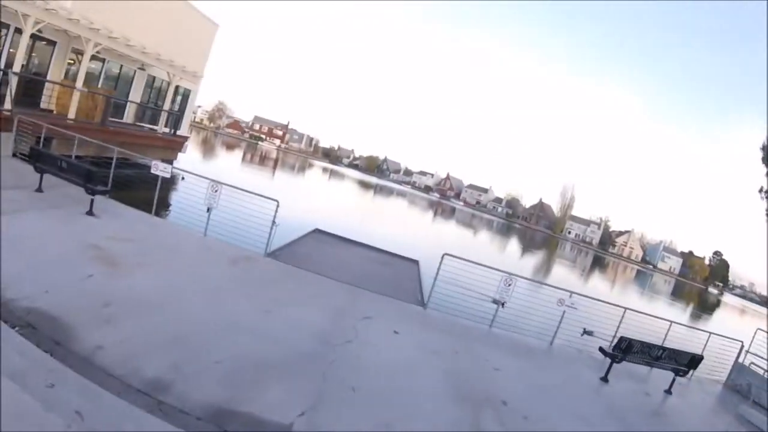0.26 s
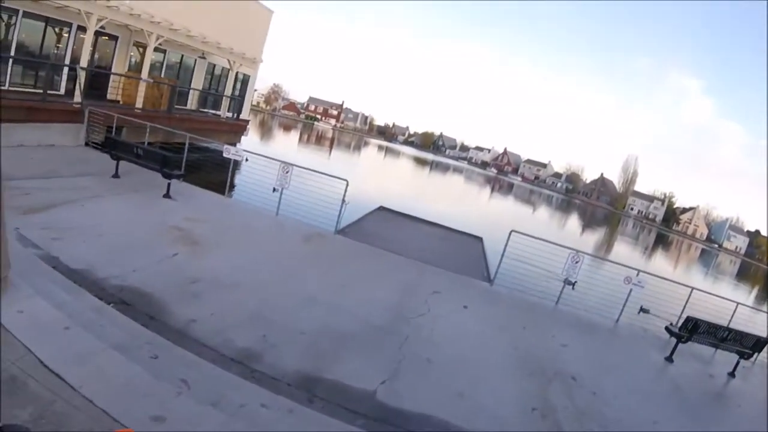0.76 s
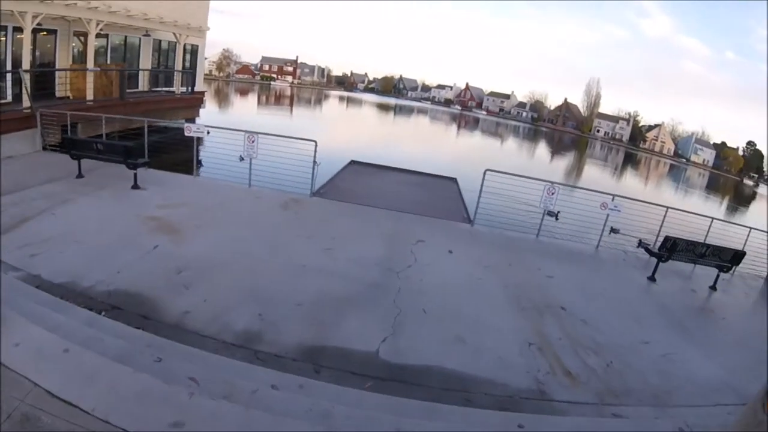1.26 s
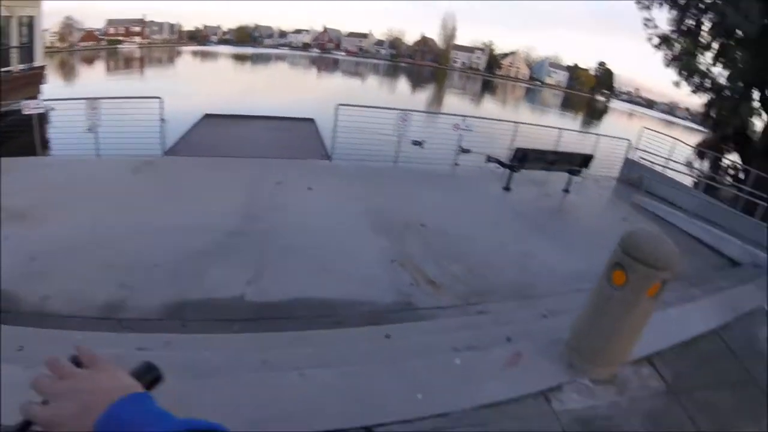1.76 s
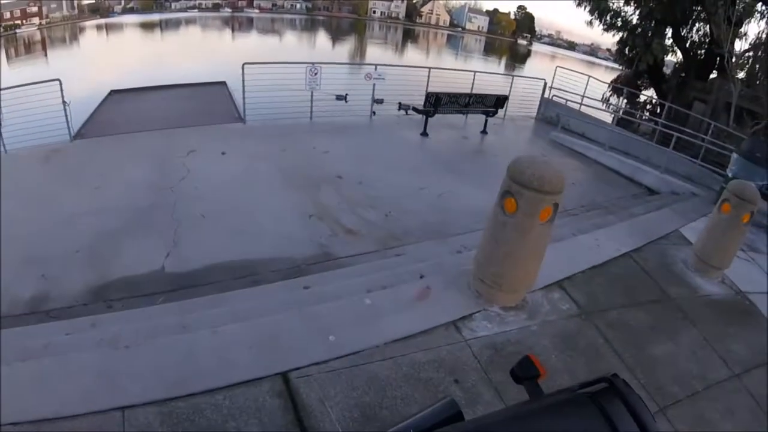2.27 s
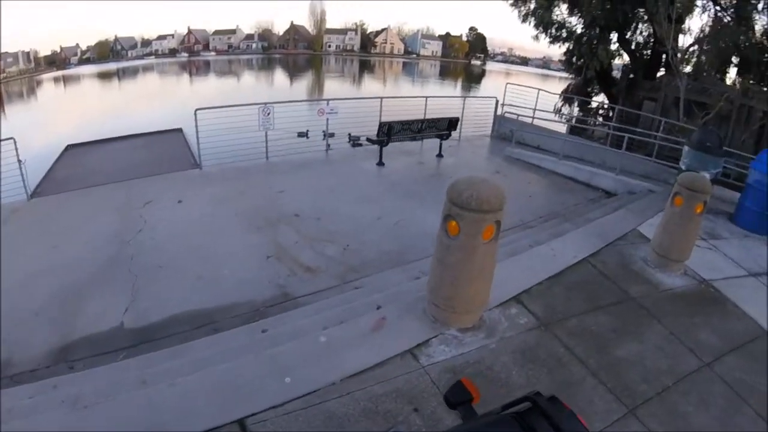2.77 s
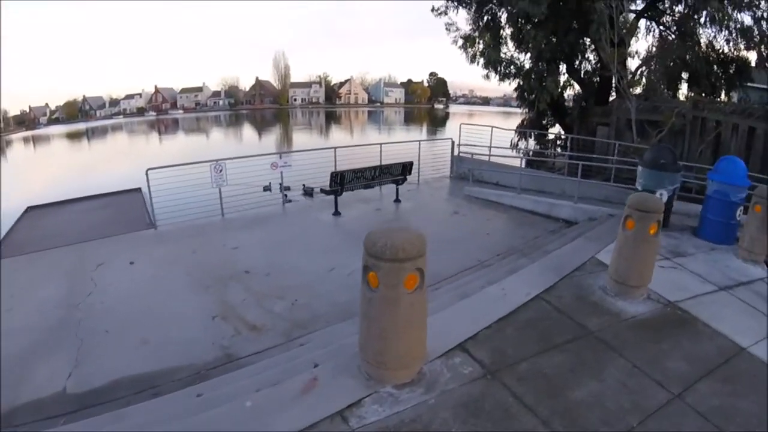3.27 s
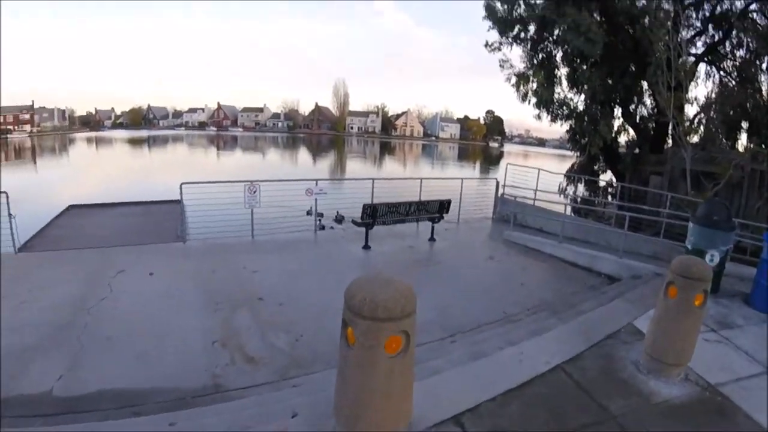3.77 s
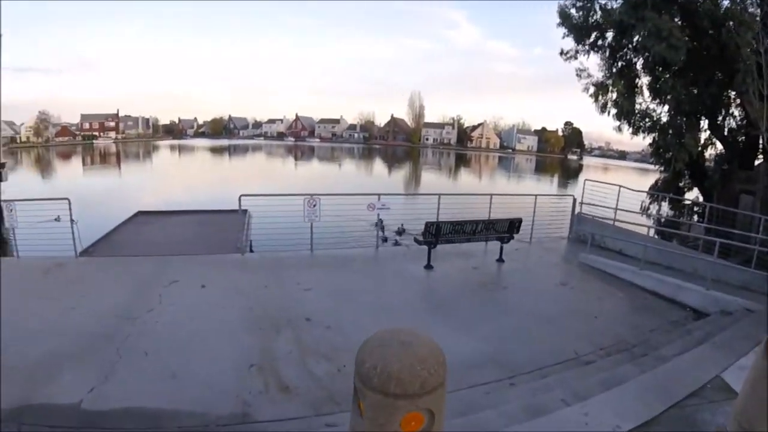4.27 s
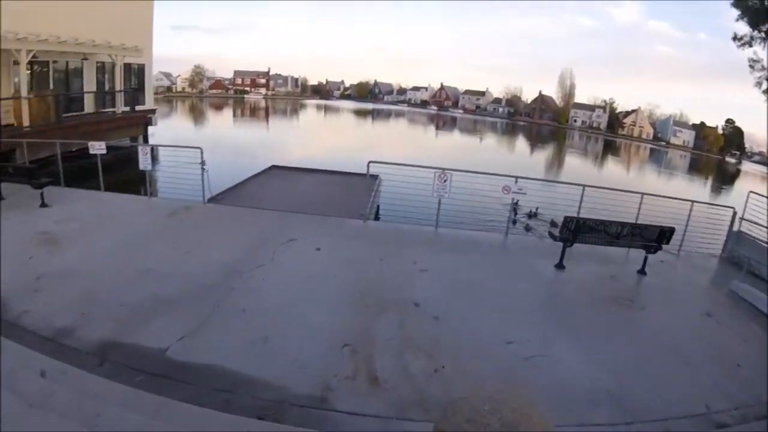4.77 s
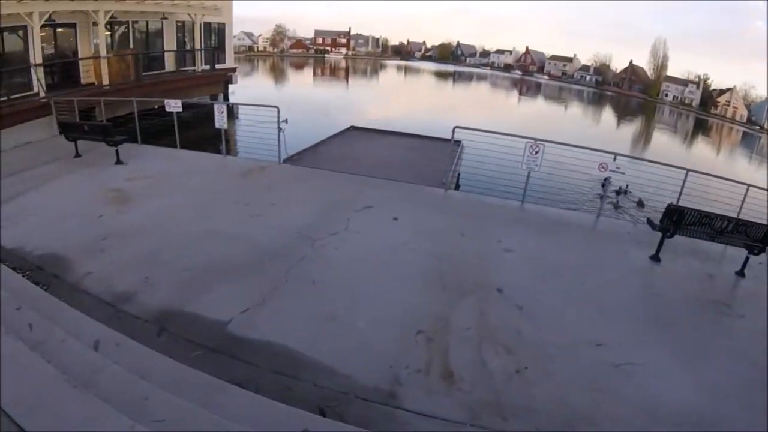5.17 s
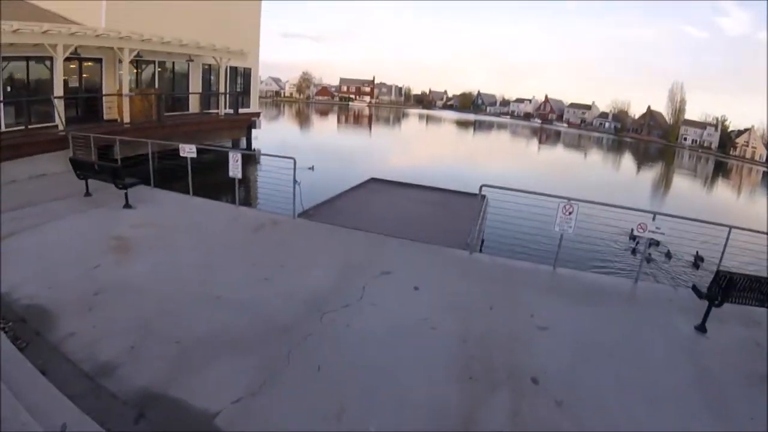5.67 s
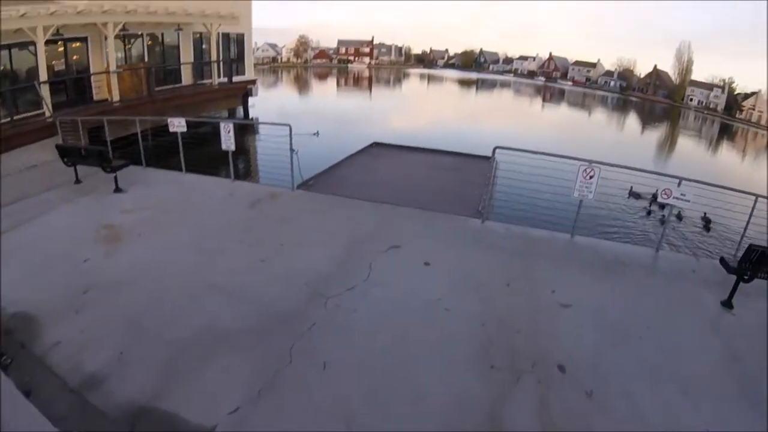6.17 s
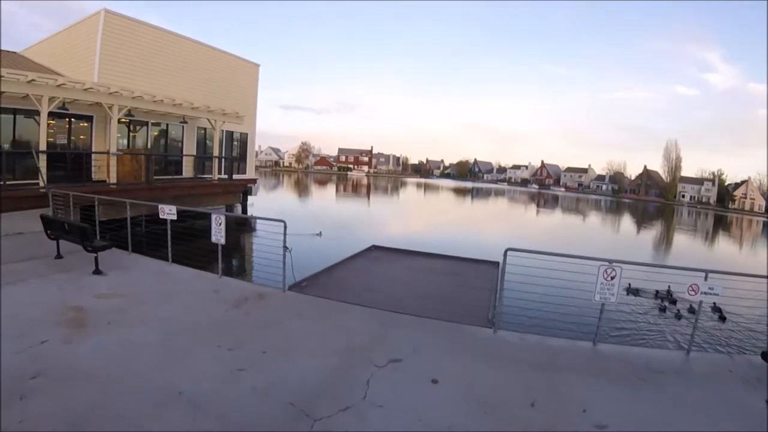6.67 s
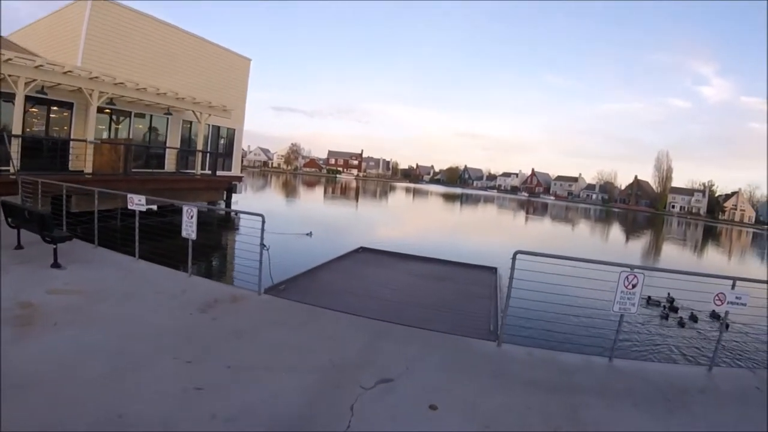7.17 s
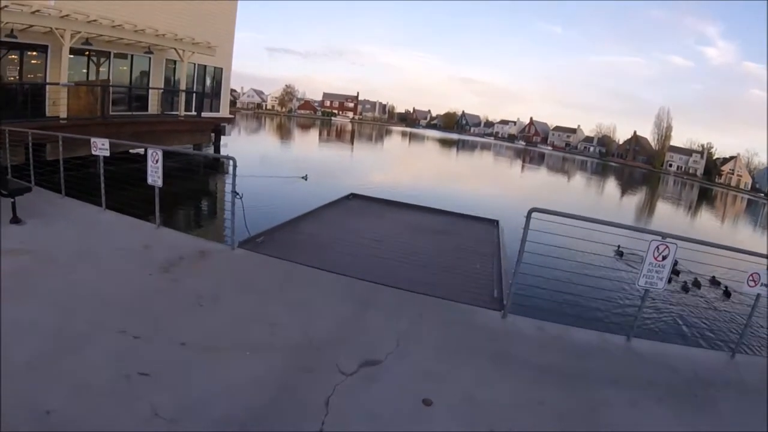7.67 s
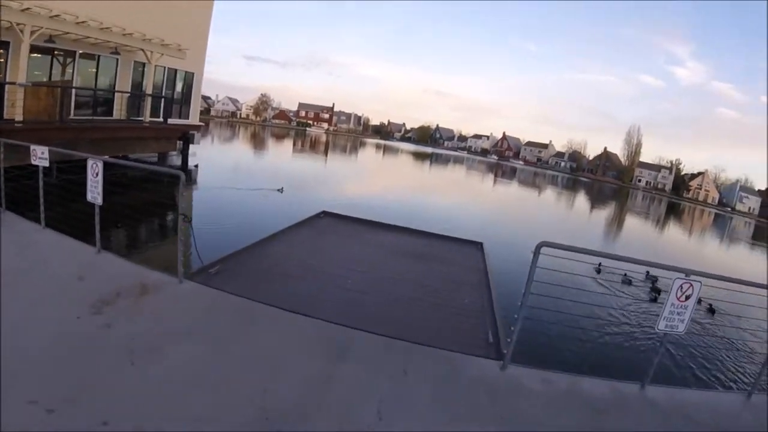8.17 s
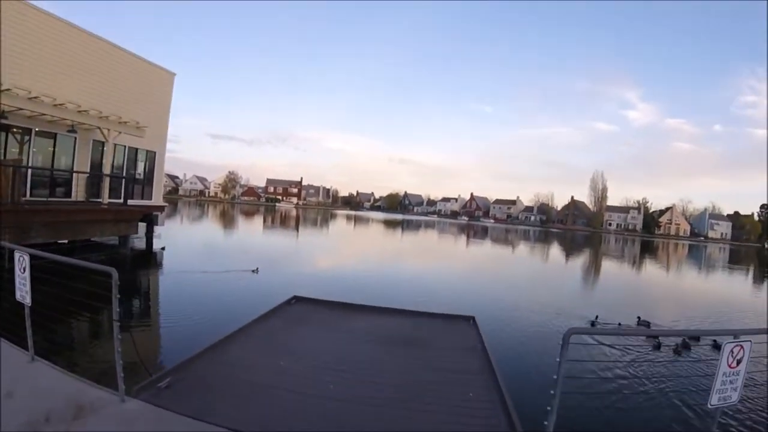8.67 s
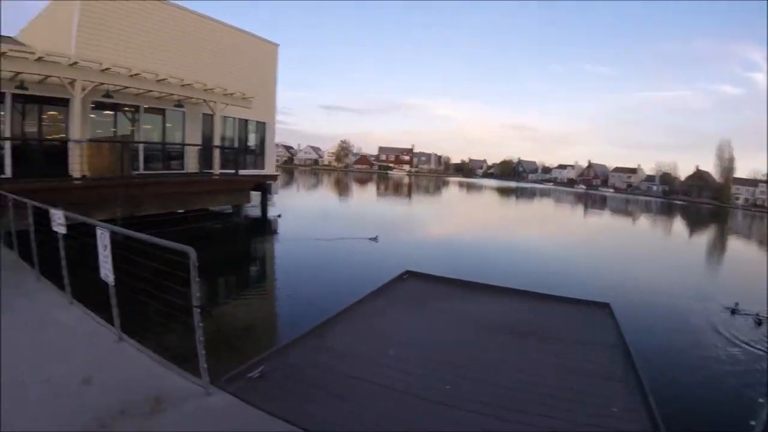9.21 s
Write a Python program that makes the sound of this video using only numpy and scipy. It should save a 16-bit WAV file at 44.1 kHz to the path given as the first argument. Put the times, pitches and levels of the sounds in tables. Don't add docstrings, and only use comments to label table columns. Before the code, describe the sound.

Lumpy low motorcycle idle with raspy exhaust and engine rattle, close at first, then receding beneath dull handling thumps, small clicks and light breeze.

```python
import sys
import numpy as np
from scipy import signal
from scipy.fft import rfft, irfft
from scipy.io import wavfile
from scipy.ndimage import uniform_filter1d

SR = 44100
rng = np.random.default_rng(int(sys.argv[2]) if len(sys.argv) > 2 else 0)


def dump(signal):
    limited = np.clip(np.atleast_2d(signal).T, -1, 1)
    pcm = np.round(limited * 32767).astype(np.int16)
    wavfile.write(sys.argv[1], SR, pcm)


def field_ratio(decibels):
    return 10 ** (np.asarray(decibels, dtype=float) / 20)


N = 416304

# (time [s], firing rate [Hz])
IDLE_SPEED = [(0.0, 18.412), (0.23, 18.399), (0.53, 17.845), (1.07, 18.774), (1.8, 18.754), (2.03, 19.545),
              (2.79, 17.927), (3.55, 18.576), (4.22, 17.604), (4.52, 18.592), (5.01, 17.591), (5.05, 18.03),
              (5.98, 18.419), (6.29, 17.427), (6.61, 17.919), (8.37, 18.167), (9.01, 19.152), (9.44, 18.26)]
FIRST_TURN, POP_LEAD_S = -1.54, .0101
WARM = SR // 4
# (resonance [Hz], width [Hz])
CHAMBERS = [(49, 26.4), (82, 61), (119, 46.7), (145, 11.85)]
# (resonance [Hz], width [Hz], level [dB])
TAILPIPE = [(187.9, 15, 2.5), (226.7, 18, 2), (256.7, 29, 1), (325.7, 27.3, 0), (381, 136, -13)]
# (frequency [Hz], density [dB per Hz])
CASE_NOISE = [(200, -13.5), (320, -17), (420, -18), (660, -22), (900, -25), (1250, -28.5), (1700, -27),
              (2600, -34.5), (3900, -38), (5500, -48.5), (9000, -71.5)]
# (resonance [Hz], width [Hz], level [dB])
PANELS = [(754.3, 48, -9), (1116, 36, -21.5), (1657, 200, -19), (478, 60, -17.5), (636, 12, -27),
          (595, 70, -19.5), (936, 90, -20.5), (2690, 1000, -23)]
# (time [s], half length [s], swell [dB])
PANEL_SWELLS = [
    [(1.95, .15, -4), (2.55, 0.4, 6), (3.65, 0.18, 4.5), (4.1, 0.16, -7), (7.3, .3, -1.5), (8.3, 0.25, 2)],
    [(1.95, 0.22, 8), (5.3, .4, 5.5)],
    [(.95, .06, 7.5), (1.9, .2, 5)],
    [(2.2, .3, 6), (4.1, .4, 4.5)],
    [(3.552, .35, 12)],
    [(.8, 0.8, 7.5), (2.9, .1, 8)],
    [(.6, .2, 7.5), (3.4, .5, 8)],
    [(1.0, .1, 7.5), (1.9, .12, 6), (6.2, .5, 6.5), (8.7, .4, 8)],
]
# (frequency [Hz], density [dB per Hz])
INTAKE_HISS = [(2500, -57), (3800, -40.5), (4500, -35.5), (5000, -28.5), (5900, -31), (7200, -37),
               (8100, -41), (10500, -59), (14000, -83.5), (15000, -98)]
HOUSING_HZ, HOUSING_WIDTH_HZ, HOUSING_DB = 6454, 420, -4.5
RATTLE_DB, HISS_DB = -26.5, -39.5
RATTLE_PER_OPENING, HOUSING_PER_OPENING = 0.34, 0.7

# (time [s], exhaust level [dB], tailpipe level in line with the head [dB], case level [dB])
PLACE = [(0, -13.5, -22, -0.5), (.7, -14.5, -20, 0), (1.201, -13, -19.5, -0.5), (1.6, -13, -19.5, -2.5),
         (2.201, -11, -16, 0), (2.8, -14, -16.5, 0.5), (3.201, -12, -14.5, 0), (3.9, -13.5, -15.5, -0.5),
         (4.5, -14, -17, 0.5), (5.2, -14, -22.5, 1), (5.8, -13.5, -30, 0.5), (6.3, -16, -22.5, 2),
         (7.0, -18, -17.5, 2.5), (7.6, -22, -14.5, 2), (8.3, -25, -19, 2.5), (8.9, -22.5, -24, 3),
         (9.44, -25.5, -15.5, 3)]
# (time [s], half length [s], opening [dB])
GLANCES = [(0.11, 0.037, 4.5), (0.455, 0.091, 2), (0.952, 0.053, 3.5), (1.502, 0.64, 5), (1.86, 0.15, 8.5),
           (2.717, 0.27, 5.5), (3.7, 0.63, -1), (5.404, 0.46, 1.5), (6.15, 0.16, 2), (6.448, 0.17, -2.5),
           (7.268, 0.067, 3.5), (7.848, .2, -3), (8.902, 0.031, 4), (9.147, 0.16, 6.5), (9.44, 0.051, 9)]
# (time [s], half length [s], extra facing [dB], negative turns away)
SHOULDER = [
    (6.6, .7, -7),
    (8.0, 0.46, 5.5),
    (1.4, 0.26, 3),
]
SHADE_HZ, SHADE_WIDTH_HZ, SHADE_DEPTH, SHADE_PER_OPENING = 4000, 1300, .4, -0.12
# (time [s], depth [dB])
DUCKS = [
    (3.929, -5),
    (6.29, -3.5),
    (7.2, -3.5),
    (7.69, -4.5),
]
DUCK_ATTACK_S, DUCK_RELEASE_S = .02, 0.69

# (time of widest swing [s], peak [dB], ring [Hz], direction [+-1])
STEPS = [(2.014, -23, 32, -1), (2.209, -18, 41, 1), (2.957, -23, 37, -1), (3.34, -18, 26, 1),
         (3.984, -11, 26, -1), (4.64, -16, 32, -1), (5.139, -14, 35, -1), (5.736, -16, 29, -1),
         (6.327, -9, 33, 1), (6.423, -11, 27, -1), (6.824, -10, 27, -1), (7.193, -7, 32, 1),
         (7.704, -9, 26, 1), (7.79, -11, 27, 1), (7.937, -15, 33, 1), (8.13, -20, 18, 1),
         (8.286, -24, 34, -1), (8.882, -23, 27, 1), (9.233, -24, 31, 1), (9.357, -22, 31, -1),
         (9.423, -16, 30, -1)]
STEP_DECAY_S = .03
# (time [s], peak [dB], ring [Hz], decay [s], direction [+-1])
TOES = [
    (4.59, -21, 28, .02, 1),
    (5.205, -17, 27, .03, 1),
    (5.83, -23, 30, .02, 1),
    (6.9, -23, 14, .04, 1),
    (7.19, -15, 60, .008, 1),
    (7.69, -12, 50, .008, -1),
    (7.777, -19, 50, .008, -1),
    (7.924, -21, 50, .008, -1),
    (8.01, -22, 30, .02, 1),
]
# (time [s], peak [dB], ring [Hz], decay [ms], direction
TICKS = [
    (3.923, -18, 60, 2, -1),
    (7.1663, -22, 2400, .3, -1),
    (7.1895, -14, 220, 1.2, 1),
    (7.632, -41, 3000, .3, 1),
    (7.795, -40, 2000, .3, 1),
    (8.2038, -23, 400, .5, 1),
    (8.244, -29, 700, .5, -1),
    (7.819, -44, 6000, .3, 1),
]
# (time [s], peak [dB], ring [Hz])
KNOCKS = [
    (6.297, -23, 750),
    (7.666, -23, 420),
    (7.906, -35, 600),
    (8.1795, -28, 950),
]
TICK_RISE_MS, KNOCK_RISE_MS, KNOCK_DECAY_MS = .03, .55, 2
# (time [s], peak [dB], pitch [Hz])
SQUEAKS = [(0.0952, -31, 6520), (1.505, -43, 6480), (1.6926, -39.5, 6490), (1.7709, -31.5, 6500),
           (1.8836, -26, 6490), (4.0287, -40.5, 6420), (4.1964, -39.5, 6440), (4.2532, -40.5, 6490),
           (4.3665, -37.5, 6490), (4.801, -45.5, 6330), (4.9125, -38, 6340), (5.6336, -37, 6390),
           (6.222, -39, 6610)]
SQUEAK_DECAY_S = .006
# (frequency [Hz], density [dB per Hz])
SELF_NOISE = [(2000, -7), (7000, -5), (9000, -2.5), (12000, -9), (14000, -15.5), (16000, -27.5)]
SELF_NOISE_DB = -73
# (time [s], lowest lost [Hz], length [ms], depth [dB])
DROPOUTS = [(.332, 1000, 13, -13), (.991, 1300, 14, -14), (1.1, 1000, 14, -15), (1.729, 1000, 26, -40),
            (1.782, 1500, 12, -16), (2.188, 1800, 15, -18), (2.271, 1500, 14, -14), (3.3, 2200, 22, -15),
            (3.81, 2500, 21, -18), (4.065, 3500, 24, -16), (5.004, 2500, 20, -17), (5.153, 2300, 13, -19),
            (5.491, 2900, 16, -28), (5.558, 2500, 12, -18), (5.941, 1300, 13, -15), (6.285, 1000, 12, -18),
            (6.346, 1100, 15, -30), (6.53, 2300, 28, -26), (6.772, 1100, 11, -26), (6.861, 900, 14, -15),
            (7.841, 1300, 11, -18), (9.313, 1500, 20, -19)]
EDGE_HZ, EDGE_WANDER_HZ, EDGE_OPEN_SHARE = 13600, 450, .1


def level(x, db):
    return x * field_ratio(db) / np.sqrt(np.mean(x ** 2))


def ring(x, hz, width_hz):
    r = np.exp(-np.pi * width_hz / SR)
    poles = [1, -2 * r * np.cos(2 * np.pi * hz / SR), r * r]
    return signal.lfilter([sum(poles)], poles, x)


def band(x, hz, width_hz):
    return signal.lfilter(*signal.iirpeak(hz, hz / width_hz, SR), x)


def band_noise(hz, width_hz, second_width_hz):
    return band(band(rng.standard_normal(N), hz, width_hz), hz, second_width_hz)


def coloured(table):
    hz, db = np.transpose(table)
    bins_hz = np.arange(1, N // 2 + 2) * SR / N
    shape = np.interp(np.log(bins_hz), np.log(hz), db, -120, -120)
    return level(irfft(rfft(rng.standard_normal(N)) * field_ratio(shape), N), 0)


def walk(rate):
    k = int(SR / rate)
    held = np.repeat(rng.standard_normal(N // k + 1), k)
    return 1.1 * uniform_filter1d(uniform_filter1d(held, k), k)[:N]


def swells(rows):
    t = np.arange(N) / SR
    return sum(db * np.exp(-((t - s) / half) ** 2) for s, half, db in rows)


def pops(turn):
    count = np.arange(-5, int(turn[-1]) + 1)
    timing, strength, fickle = rng.standard_normal((200, 3))[:len(count)].T
    second = count % 2
    before = np.minimum(count - turn[0], 0) / (turn[1] - turn[0])
    at = WARM + before + np.searchsorted(turn, count) + (0.00042 * timing - POP_LEAD_S) * SR
    size = field_ratio(0.99 * second + 0.75 * strength)
    hunting = .08 + .42 * np.cos(np.pi / 3 * (count - 1)) + .2 * fickle
    back = np.where(second, hunting, 1.035 + 0.029 * fickle)
    out = np.zeros(WARM + N + SR)
    np.add.at(out, at.astype(int), size)
    np.add.at(out, (at + 0.012926 * SR).astype(int), size * back)
    return out[:WARM + N]


def exhaust(pulses):
    flow = signal.lfilter([1, -2, 1], 1, pulses)
    for hz, width_hz in CHAMBERS:
        flow = ring(flow, hz, width_hz)
    return level(flow[WARM:], 0)


def bark(pulses, away_db):
    front = np.roll(pulses, int(0.00801 * SR))[WARM:]
    puff = (level(ring(np.abs(front), 18, 70), 0) + .5) * rng.standard_normal(N)
    drive = ring(level(front, 0) + level(puff, -0.08), 420, 1000)
    out = np.zeros(N)
    for k, (hz, width_hz, db) in enumerate(TAILPIPE):
        beam = field_ratio(db + 1.2 * away_db * np.log2(hz / 270))
        out += (-1) ** k * beam * band(drive, hz, width_hz)
    return level(out, 0)


def rattle(turn):
    out = coloured(CASE_NOISE) * field_ratio(1.0 * np.cos(4 * np.pi * turn) + 1.1 * walk(25))
    for (hz, width_hz, db), facing in zip(PANELS, PANEL_SWELLS):
        panel = band_noise(hz, width_hz, 2 * width_hz)
        out = out + level(panel, db) * field_ratio(1.3 * np.tanh(walk(16)) + swells(facing))
    return level(out, 0)


def hiss(turn, open_db):
    valve = 1 + .5 * np.exp(-((turn + 0.29) % 1) / 0.13)
    air = coloured(INTAKE_HISS) * field_ratio(1.7 * walk(59))
    housing = level(band_noise(HOUSING_HZ, HOUSING_WIDTH_HZ, 2 * HOUSING_WIDTH_HZ), HOUSING_DB)
    housing = housing * field_ratio(1.5 * walk(30) + HOUSING_PER_OPENING * open_db)
    return level(valve * (air + housing), 0)


def shade(x, open_db):
    depth = np.clip(SHADE_DEPTH + SHADE_PER_OPENING * open_db, 0, .9)
    return x - depth * band(x, SHADE_HZ, SHADE_WIDTH_HZ)


def motorcycle(near_db, bark_db, cases_db, open_db):
    t = np.arange(N) / SR
    turn = FIRST_TURN + np.cumsum(np.interp(t, *np.transpose(IDLE_SPEED))) / SR
    pulses = pops(turn)
    away_db = uniform_filter1d(near_db, size=SR) + 13 + swells(SHOULDER)
    rattle_db = RATTLE_DB + RATTLE_PER_OPENING * open_db + cases_db
    bike = exhaust(pulses) + field_ratio(bark_db) * bark(pulses, away_db)
    bike = bike + field_ratio(rattle_db) * rattle(turn)
    bike = bike + field_ratio(HISS_DB + open_db) * hiss(turn, open_db)
    return shade(bike, open_db)


def footfalls():
    out, t = np.zeros(N + SR), np.arange(-SR // 10, SR // 4) / SR
    heels = [(s, db, hz, STEP_DECAY_S, way) for s, db, hz, way in STEPS]
    for s, db, hz, decay, way in heels + TOES:
        envelope = np.exp(-(t / np.where(t < 0, min(.018, decay), decay)) ** 2)
        swing = envelope * np.cos(2 * np.pi * hz * t)
        out[int((s + t[0]) * SR):][:len(t)] += field_ratio(db + 1.0) * way * swing
    return out[:N]


def ticks():
    out, t_ms = np.zeros(N + SR), np.arange(1024) / SR * 1000
    hard = [row + (TICK_RISE_MS,) for row in TICKS]
    soft = [row + (KNOCK_DECAY_MS, 1, KNOCK_RISE_MS) for row in KNOCKS]
    for s, db, hz, decay_ms, way, rise_ms in hard + soft:
        envelope = (1 - np.exp(-t_ms / rise_ms)) ** 2 * np.exp(-t_ms / decay_ms)
        tick = envelope * np.cos(2 * np.pi * hz * t_ms / 1000)
        out[int(s * SR):][:len(t_ms)] += field_ratio(db) * way * tick
    return ring(ring(out[:N], 6000, 7000), 6000, 9000)


def squeaks():
    out, t = np.zeros(N + SR), np.arange(2048) / SR
    envelope = (1 - np.exp(-t / .002)) * np.exp(-t / SQUEAK_DECAY_S)
    for s, db, hz in SQUEAKS:
        out[int(s * SR):][:len(t)] += field_ratio(db) * envelope * np.sin(2 * np.pi * hz * t)
    return out[:N]


def breeze():
    return level(band_noise(28, 30, 40), -17) * field_ratio(3 * walk(5))


def self_noise(near_db):
    return level(coloured(SELF_NOISE), SELF_NOISE_DB) * field_ratio(0.45 * (near_db + 22) + 1.5 * walk(17))


def gain_control(t):
    duck_db = np.zeros(N)
    for s, db in DUCKS:
        after = np.maximum(t - s, 0)
        duck_db += db * (1 - np.exp(-after / DUCK_ATTACK_S)) * np.exp(-after / DUCK_RELEASE_S)
    return duck_db


def scene():
    t = np.arange(N) / SR
    s, *columns = np.transpose(PLACE)
    place_db, bark_db, cases_db = (np.interp(t, s, c) for c in columns)
    near_db, open_db = place_db + gain_control(t), swells(GLANCES)
    outside = motorcycle(near_db, bark_db, cases_db, open_db) + breeze()
    mount = footfalls() + ticks() + squeaks()
    return (outside * field_ratio(near_db) + mount + self_noise(near_db))[None]


def treble_dropouts(x):
    hz, t, frames = signal.stft(x, SR, nperseg=512, noverlap=448)
    spared = rng.random((len(DROPOUTS), len(hz))) < 230 / (hz + 600)
    spared |= np.abs(hz - HOUSING_HZ) < 100
    for (s, lo_hz, ms, db), kept in zip(DROPOUTS, spared):
        gate, longer = (np.clip(2.5 - 4 * np.abs(t - s) / (span / 1000), 0, 1) for span in (ms, ms + 12))
        loss_db = np.outer((hz > lo_hz) * ~kept * db, gate)
        lift_db = np.outer((hz > lo_hz) * kept * np.where(hz < 6000, 9, 3), longer)
        frames = frames * field_ratio(loss_db + lift_db)
    luck = np.repeat(rng.random((len(t) // 16 + 1, 2)), 16, axis=0)[:len(t)].T
    edge = EDGE_HZ + EDGE_WANDER_HZ * 2 * (luck[0] - .5) + 2500 * (luck[1] < EDGE_OPEN_SHARE)
    frames = frames * (hz[:, None] < edge)
    return signal.istft(frames, SR, nperseg=512, noverlap=448)[1][..., :N]


def band_limit(x):
    return signal.sosfilt(signal.butter(12, 16000, fs=SR, output="sos"), x)


def record(dry):
    rounded = np.tanh(.8 * dry) / .8
    return band_limit(treble_dropouts(rounded))


dry = scene()
out = record(dry)
dump(out)
```